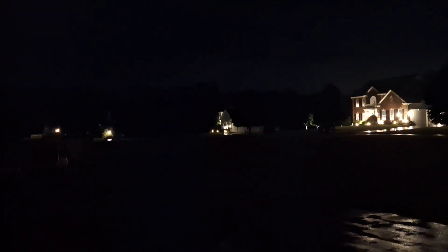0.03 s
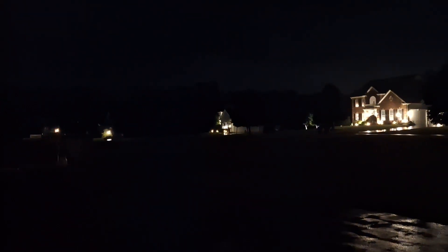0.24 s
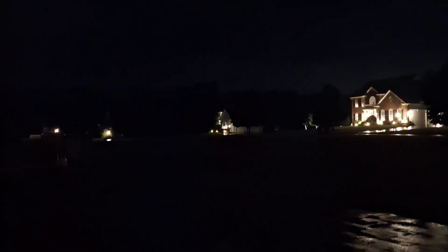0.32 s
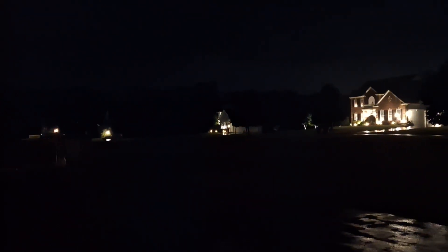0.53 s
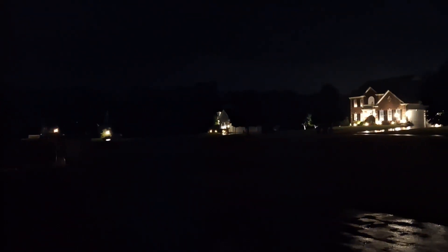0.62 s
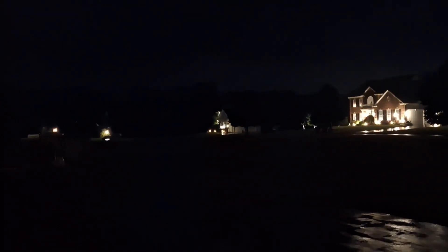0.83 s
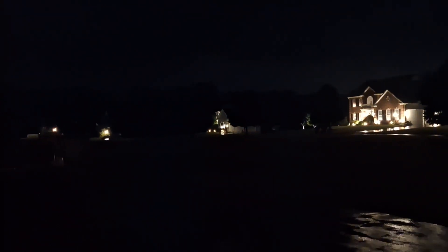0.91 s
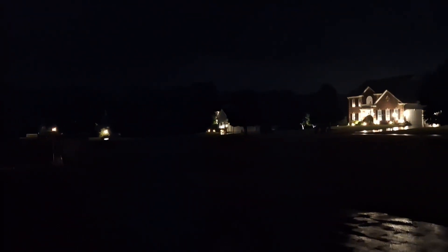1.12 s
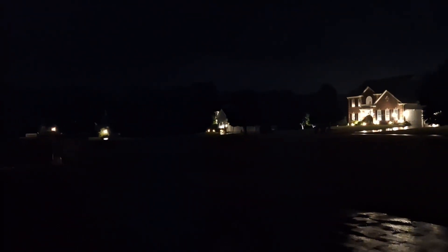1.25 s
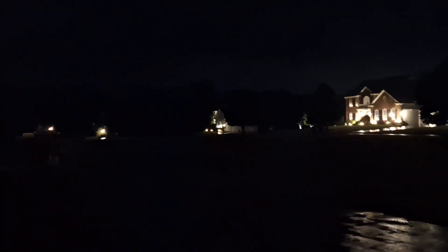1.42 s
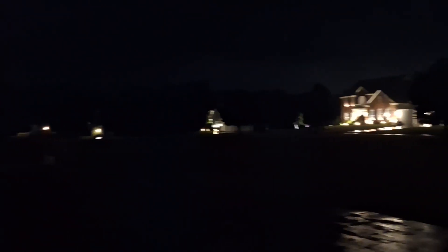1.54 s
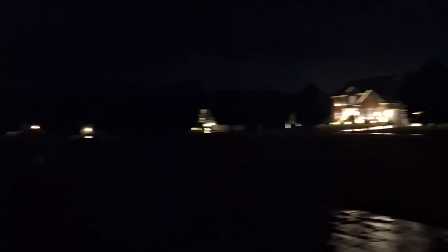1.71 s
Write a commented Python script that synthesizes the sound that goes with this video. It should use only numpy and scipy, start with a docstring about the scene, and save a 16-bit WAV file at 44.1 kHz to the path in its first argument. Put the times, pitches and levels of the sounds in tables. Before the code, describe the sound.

Thunder rumbles in quick, low, uneven booms, peaking in one heavy thud about halfway, then rolling down; light rain hisses and drops tick close by, with a faint cricket, outdoors at night, in wide stereo.

```python
"""A porch on a rainy night: hiss, patter and a pulsing cricket run throughout, made of filtered noise.
Thunder rolls as scattered clicks; from 0.2 s short pressure swings boom over it, strongest near 0.8 s.
Single drops tick and splash on both sides as noise bursts, and now and then a longer spatter or a trill.
The two microphones face different ways, so each colours the rain in its own manner."""
import sys
import numpy as np
from scipy import signal
from scipy.fft import rfft, irfft
from scipy.io import wavfile
from scipy.ndimage import uniform_filter1d

SR = 44100
rng = np.random.default_rng(int(sys.argv[2]) if len(sys.argv) > 2 else 0)


def generate_wav(sig):
    """Save sig (samples, or channels by samples) to the path in sys.argv[1] as 16-bit PCM at SR."""
    pcm = np.round(np.clip(np.atleast_2d(sig).T, -1, 1) * 32767).astype(np.int16)
    wavfile.write(sys.argv[1], SR, pcm)


N = 79380


def amp(db):
    """Turns dB into a factor on the amplitude."""
    return 10 ** (np.asarray(db) / 20)


def evened(x):
    """Scales a signal to an RMS of one."""
    return x / np.sqrt(np.mean(x ** 2) + 1e-20)


def read(points, hz):
    """Reads a dB curve on a log frequency axis; below its first point it is -60 dB."""
    f, value = np.transpose(points)
    return np.interp(np.log(hz + 1), np.log(f), value, left=-60)


def over_time(table, column):
    """Draws one column of a table as a curve over the scene; column 0 holds seconds."""
    return np.interp(np.arange(N) / SR, *np.transpose(table)[[0, column]])


def panned(db):
    """Left and right factors that differ by db; positive is louder on the left."""
    return amp([[db / 2], [-db / 2]])


def add(mix, s, sound):
    """Adds a sound to the mix from s seconds, cut at the end of the mix."""
    part = mix[..., round(s * SR):][..., :sound.shape[-1]]
    part += sound[..., :part.shape[-1]]


def coloured(x, gain):
    """Multiplies the spectrum by gain(Hz), with zero padding."""
    size = x.shape[-1] + 2048
    spectrum = rfft(x, size) * gain(np.fft.rfftfreq(size, 1 / SR))
    return irfft(spectrum, size)[..., :x.shape[-1]]


def hump(hz, centre_hz, octaves):
    """A bell-shaped band on a log frequency axis; octaves is its standard deviation."""
    return np.exp(-.5 * (np.log2((hz + 1) / centre_hz) / octaves) ** 2)


def half_width_bell(x, width):
    """A bell that peaks at one, with its full width given at half height."""
    return .5 ** ((2 * x / width) ** 2)


def clicks(per_s, spread_db):
    """Two trains of random clicks of either sign, a few of them large."""
    level_db = spread_db * np.minimum(rng.exponential(1, (2, N)), 4)
    size = amp(level_db) * rng.choice([-1., 1.], (2, N))
    return size * (rng.random((2, N)) < per_s / SR)


def thunder():
    """Rolls and booms reach both microphones more alike in the lows, with a phase shift on the left."""
    # Each row: frequency in Hz, left-right likeness from 0 to 1.
    likeness = [(60, .98), (150, .95), (300, .78), (600, .55), (1200, .3)]
    # Each row: frequency in Hz, phase of the left channel in radians.
    left_phase = [(60, -.58), (150, -.56), (300, -.35), (450, -.9), (600, -1.6), (800, -2.6), (1200, -3.1)]
    pan_db = 2
    x = roll()
    add_booms(x[0])
    alike = lambda f: np.clip(np.interp(f, *np.transpose(likeness)), 0, 1)
    lag = lambda f: np.exp(1j * np.interp(f, *np.transpose(left_phase)))
    same = coloured(x[0], lambda f: np.sqrt((1 + alike(f)) / 2))
    other = coloured(x[1], lambda f: np.sqrt((1 - alike(f)) / 2))
    return np.array([coloured(same + other, lag), same - other]) * panned(pan_db)


def roll():
    """Scattered small shocks, coloured in three bands, blend into the rolling; levels precede the stereo spread."""
    # Spectra of the deep, middle and upper roll. Each row: frequency in Hz, gain in dB.
    deep_colour = [(22, -31), (36, -20), (54, 0.5), (113, -3.5), (150, -16), (167, -12), (200, -18.5),
                   (260, -12.5), (440, -120)]
    middle_colour = [(76, -18), (130, 4.5), (167, -6), (187, -0.5), (204, 4.5), (243, -8), (275, -17.5),
                     (330, -7.5), (430, -36), (730, -120)]
    upper_colour = [(160, -38), (270, -12), (314, -7), (381, 0), (440, -10), (476, -6.5), (612, -14),
                    (676, -16.5), (781, -25), (1130, -39.5), (1700, -49), (3300, -120)]
    # Each row: time in seconds, deep roll level in dB.
    deep_levels = [(0, -45.5), (.19, -41.5), (.25, -37), (.55, -38), (.6, -34.5), (.76, -36.5),
                   (.82, -27.5), (.98, -38.5), (1.25, -34), (1.38, -43), (1.5, -40), (1.8, -40)]
    # Each row: time in seconds, middle roll level in dB, upper roll level in dB.
    higher_levels = [(0.0, -55.5, -52), (0.174, -46.5, -49.5), (0.235, -37.5, -35.5), (0.37, -37.5, -37),
                     (0.42, -41.5, -44.5), (0.566, -44, -44.5), (0.586, -36.5, -44), (0.62, -36.5, -38.5),
                     (0.656, -33, -47), (0.71, -43, -46), (0.802, -27, -41.5), (0.842, -38, -44),
                     (0.986, -42.5, -52), (1.012, -29, -33.5), (1.148, -44, -49.5), (1.168, -34, -45.5),
                     (1.388, -53, -53.5), (1.42, -42.5, -54), (1.5, -50.5, -53.5), (1.8, -55, -55)]
    shocks_per_s, spread_db = 500, 1.5  # the higher bands get two and four times as many shocks
    deep, middle, upper = (clicks(shocks_per_s * k, spread_db) for k in (1, 2, 4))
    deep = coloured(deep, lambda f: amp(read(deep_colour, f)))
    middle = coloured(middle, lambda f: amp(read(middle_colour, f)))
    upper = coloured(upper, lambda f: amp(read(upper_colour, f)))
    x = evened(deep) * amp(over_time(deep_levels, 1))
    x += evened(middle) * amp(over_time(higher_levels, 1))
    x += evened(upper) * amp(over_time(higher_levels, 2))
    return x


def add_booms(x):
    """Each boom is a short low pressure swing that knocks the porch air at three higher pitches."""
    # Each row: centre in seconds, peak in dB before the stereo spread, pitch in Hz, width in seconds,
    # knock level in dB, knock offset from the boom centre in seconds.
    booms = [(.218, -38, 100, 0.024, -30, 0.0037), (.259, -27, 95, 0.026, -25.5, -0.0043),
             (0.286, -28.5, 117, 0.025, -45, 0.01), (0.317, -28, 68.6, 0.015, -35, 0.0028),
             (0.362, -27, 125, 0.031, -31, -0.00095), (.416, -25.5, 117, 0.0095, -34, 0.0072),
             (0.477, -41, 76.6, 0.032, -52, -0.0029), (0.548, -36, 87, 0.026, -51, 0.01),
             (.603, -19, 83.6, 0.016, -27.5, -.014), (0.647, -25.5, 107, 0.013, -35.5, 0.016),
             (.735, -28.5, 92, 0.018, -39, 0.013), (0.763, -21, 77, 0.016, -31, -0.0084),
             (.796, -7, 96, 0.013, -23, 0.0099), (.829, -16.5, 87, 0.0082, -38, 0.0045),
             (.853, -25.5, 100, 0.028, -33, .0), (0.884, -21.5, 70.5, 0.024, -37, 0.018),
             (0.941, -30.5, 91.6, 0.043, -37.5, -0.00073), (1.027, -15.5, 89, 0.019, -23.5, -0.0062),
             (1.083, -31.5, 113, 0.025, -32.5, 0.0073), (1.139, -31, 92.5, 0.018, -31.5, 0.0017),
             (1.175, -22, 92, 0.0294, -24, 0.0048), (1.213, -36, 80, 0.036, -30, -0.0019),
             (1.235, -23.5, 64, 0.014, -38, 0.014), (1.33, -30, 84, 0.021, -46, 0.0065),
             (1.414, -31.5, 85.1, 0.013, -40, 0.004), (1.582, -31, 73.6, 0.022, -57, -0.02),
             (1.49, -31.5, 95, 0.027, -55, .0), (1.527, -28, 109.3, 0.032, -54, .0)]
    # Porch air. Each row: pitch in Hz, level in dB relative to the knock level, width in seconds.
    porch_air = [(222.7, -1, .018), (378, -12.5, 0.014), (473, -17.5, 0.012)]
    t = np.arange(-.06, .06, 1 / SR)

    def swing(at, hz, width):
        return -np.cos(2 * np.pi * hz * (t - at)) * half_width_bell(t - at, width)

    for s, db, hz, width, knock_db, offset in booms:
        knock = sum(amp(d) * swing(offset, f, w) for f, d, w in porch_air)
        add(x, s + t[0], amp(db) * swing(0, hz, width) + amp(knock_db) * knock)


def rain():
    """Hiss, patter, drops and spatters share one level curve and the colour of each microphone."""
    # Each row: time in seconds, rain level in dB before the microphone colour.
    rain_level = [(0.0, -62), (0.11, -65), (0.33, -59.5), (0.812, -61), (1.192, -62.5), (1.464, -64.5),
                  (1.8, -60.5)]
    x = hiss()
    t = np.arange(5000) / SR  # every tick and splash is cut at about 0.11 s
    add_patter(x, t)
    add_drops(x, t)
    add_spatters(x, t)
    return microphones(x * amp(over_time(rain_level, 1)))


def hiss():
    """Noise whose level wanders in patches of pitch and time, and in short gusts over all pitches."""
    patch_db, gust_db = 1.32, 1  # RMS of the wander
    _, times, z = signal.stft(rng.standard_normal((2, N)), SR, nperseg=256)
    field = rng.standard_normal(z.shape[1:])
    patches = evened(uniform_filter1d(uniform_filter1d(field, 8, 0), 12, 1))
    gusts = evened(uniform_filter1d(rng.standard_normal(len(times)), 15))
    z = z * amp(patch_db * patches + gust_db * gusts)
    return evened(signal.istft(z, SR, nperseg=256)[1][:, :N])


def add_patter(x, t):
    """Random small ticks in four bands, each a fading burst of noise."""
    per_s, spread_db, level_db = 300, 5, -4.5  # rate over all four bands, level before the band shaping
    octaves, t60 = .2, .022  # t60 in seconds, before the band shaping
    ticks = clicks(per_s / 4, spread_db)[0]
    for centre_hz in (3500, 6650, 9600, 13400):
        burst = rng.standard_normal((2, len(t))) * amp(-60 * t / t60)
        tick = coloured(burst, lambda f: hump(f, centre_hz, octaves))
        shifted = np.roll(ticks, rng.integers(N))[None]  # one train, moved to a new place for each band
        x += amp(level_db) * signal.fftconvolve(shifted, tick, axes=1)[:, :N]


def add_drops(x, t):
    """A drop gives a broad first touch and a splash with a slower tail that breaks into droplets."""
    # Each row: start in seconds, noise level in dB over the hiss before the band shaping,
    # splash centre in Hz, spread in octaves, left-right difference in dB, t60 in seconds.
    drops = [(.005, 6, 10100, 0.18, -8, 0.1), (.343, 10, 7560, 0.24, 8, 0.072),
             (0.186, 13.5, 6540, 0.15, 1, 0.12), (.2543, 16.5, 12000, 0.29, -2.5, 0.048),
             (0.3012, 21, 1710, 0.28, 19, 0.0084), (0.3018, 19.5, 6200, 0.64, 6, 0.0076),
             (0.322, 15.5, 9800, 0.42, -0.5, 0.017), (.385, 23, 1800, 0.31, 13, 0.009),
             (0.4398, 12.5, 10000, 0.67, -4, 0.023), (0.4911, 24, 4720, 0.3, -3, 0.041),
             (0.4904, 22.5, 9250, 0.13, -9, 0.027), (0.69, 7, 10400, 0.53, 5, 0.15),
             (0.8173, 16.5, 4930, 0.58, 1.5, 0.038), (0.8197, 18.5, 10400, 0.45, -2, 0.048),
             (0.9102, 14.5, 11280, 0.25, -3, .03), (0.9936, 24, 5900, 0.093, -2.5, 0.039),
             (1.13, 20, 12600, 0.56, -6.5, 0.026), (1.244, 11, 11400, 0.16, -9, 0.044),
             (1.4948, 13, 3900, 0.12, -6.5, 0.04), (1.5813, 11, 9100, 0.36, -0.5, 0.044),
             (1.6918, 25.5, 9100, 0.12, -8.5, 0.018), (1.772, 25, 7830, 0.3, -6, 0.023)]
    rise_s, tail_db, tail_stretch = 0.00057, -14.5, 3.4
    crackle_db, crackle_s = 5, .002
    touch_higher, touch_db, touch_octaves, touch_t60 = 1.6, -9, 0.93, .012  # pitch ratio, dB, octaves, s
    for s, db, centre_hz, octaves, pan_db, t60 in drops:
        flicker = uniform_filter1d(rng.standard_normal(len(t)), round(crackle_s * SR))
        crackle = amp(crackle_db * evened(flicker))
        splash = coloured(rng.standard_normal((2, len(t))), lambda f: hump(f, centre_hz, octaves))
        body = amp(db - 60 * t / t60)
        tail = crackle * amp(db + tail_db - 60 * t / t60 / tail_stretch)
        add(x, s, splash * np.minimum(t / rise_s, 1) * (body + tail) * panned(pan_db))
        touch = coloured(rng.standard_normal((2, len(t))),
                         lambda f: hump(f, touch_higher * centre_hz, touch_octaves))
        add(x, s, touch * amp(db + touch_db - 60 * t / touch_t60) * panned(pan_db))


def add_spatters(x, t):
    """Longer splashes of banded noise rise quickly and run out to silence."""
    # Each row: start in seconds, length in seconds, noise level in dB over the hiss before the band
    # shaping, centre in Hz, spread in octaves.
    spatters = [(0.49, 0.1, 13.5, 1950, 0.49), (0.504, 0.044, 15, 1120, 0.21),
                (0.827, 0.052, 7, 2050, 0.54), (.509, 0.034, 7, 5200, 0.48), (0.912, 0.082, 11, 2070, 0.17),
                (1.769, 0.034, 9, 7050, 0.97)]
    rise_s = 0.0016
    for s, length, db, centre_hz, octaves in spatters:
        splash = coloured(rng.standard_normal((2, len(t))), lambda f: hump(f, centre_hz, octaves))
        shape = np.sqrt(np.clip(1 - t / length, 0, 1)) * np.minimum(t / rise_s, 1)
        add(x, s, splash * amp(db) * shape)


def microphones(x):
    """Each microphone faces its own way and colours the rain by its own curve."""
    # Rain as each microphone hears it. Each row: frequency in Hz, gain in dB before the common scaling.
    left_colour = [(700, 30), (1000, 23), (1500, 13), (2200, 10), (3000, 7), (3700, 5), (4300, 8),
                   (5000, 8), (6000, 5), (7000, 7), (7700, 9), (8300, 4), (9200, 0), (11500, -1),
                   (13000, -2), (15900, 0)]
    right_colour = [(700, 33), (1000, 19), (1500, 15.5), (2200, 11.5), (3000, 18), (3700, 22), (5000, 24),
                    (6000, 21.5), (7000, 17.5), (7700, 9), (8300, 4.5), (9200, 17.5), (10000, 16.5),
                    (11500, 10), (13000, 0), (14500, -3), (15900, 6)]
    gains = lambda f: amp([read(left_colour, f), read(right_colour, f)])
    # one scale for both, from their mean power between 3 and 12 kHz
    scale = np.sqrt(np.mean(gains(np.linspace(3000, 12000, 200)) ** 2) * .2)
    return coloured(x, gains) / scale


def crickets():
    """A near cricket in quick pulses and short trills of other insects, all narrow whistling noise."""
    # Near cricket. Each row: time in seconds, level in dB before pulsing and panning, pitch in Hz.
    near_cricket = [(0, -68.5, 4580), (.12, -55, 4570), (.26, -60.5, 4620), (.32, -56, 4610),
                    (.45, -62.5, 4555), (.55, -59, 4580), (.7, -61, 4483), (1.04, -61, 4520),
                    (1.13, -68, 4527), (1.5, -64.5, 4513), (1.8, -62.5, 4570)]
    # Single insects. Each row: start in seconds, length in seconds, level in dB before panning,
    # pitch in Hz, resonance width in Hz, left-right difference in dB.
    trills = [(0.018, 0.51, -71, 2530, 111, -8.5), (0.362, 0.12, -65.5, 5600, 70, -13),
              (0.699, 0.13, -70, 5320, 110, -8), (0.921, 0.13, -70, 5610, 110, -13),
              (1.393, 0.127, -65.5, 5310, 70, -7), (1.617, 0.065, -69, 5670, 90, -14)]
    near_width_hz, near_pan_db = 200, -6
    pulses_per_s, gap_at_s = 44, .3435
    gap_share, gap_depth = .15, 0.53  # share of a pulse period, share of the level
    trill_edge_s = 0.0082
    turn = ((np.arange(N) / SR - gap_at_s) * pulses_per_s + .5) % 1 - .5  # periods from the nearest gap
    pulses = 1 - gap_depth * half_width_bell(turn, gap_share)
    song = whistle(over_time(near_cricket, 2), near_width_hz)
    out = pulses * song * amp(over_time(near_cricket, 1)) * panned(near_pan_db)
    t = np.arange(24000) / SR
    for s, length, db, hz, width_hz, pan_db in trills:
        shape = np.clip(np.minimum(t, length - t) / trill_edge_s, 0, 1)
        add(out, s, whistle(hz + 0 * t, width_hz) * shape * amp(db) * panned(pan_db))
    return out


def whistle(hz, width_hz):
    """Noise through a double resonance, shifted up to a pitch curve and unlike in each channel."""
    z = rng.standard_normal((2, len(hz))) + 1j * rng.standard_normal((2, len(hz)))
    r = np.exp(-np.pi * width_hz / SR)
    z = signal.lfilter([1], [1, -2 * r, r * r], z)
    return evened((z * np.exp(2j * np.pi * np.cumsum(hz) / SR)).real)


def scene():
    """Thunder in the distance, rain around the porch, crickets behind."""
    return thunder() + rain() + crickets()


def record(dry):
    """A low cut against the deepest rumble, then a steep upper band limit."""
    low_cut_hz, edge_hz = 38.6, 15850
    dry = coloured(dry, lambda f: 1 / np.sqrt(1 + (low_cut_hz / (f + 1)) ** 6))
    band_limit = signal.firwin(1023, edge_hz, window=("kaiser", 9), fs=SR)
    return signal.oaconvolve(dry, band_limit[None], "same")


dry = scene()
out = record(dry)
generate_wav(out)
```